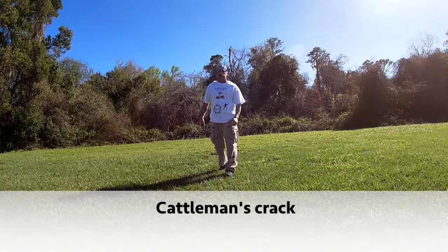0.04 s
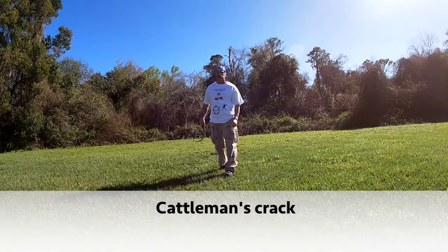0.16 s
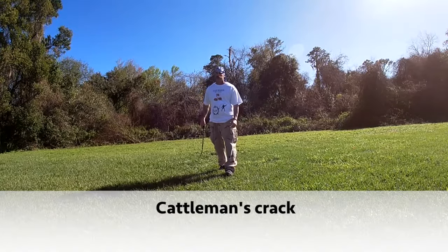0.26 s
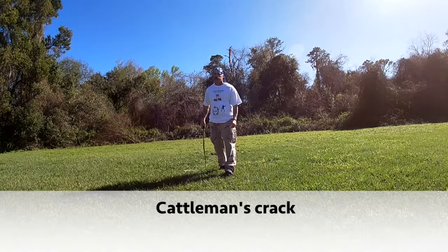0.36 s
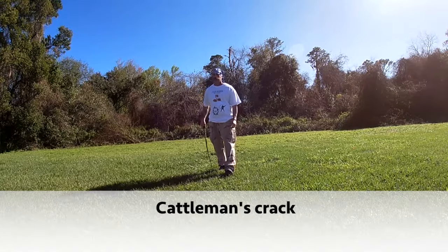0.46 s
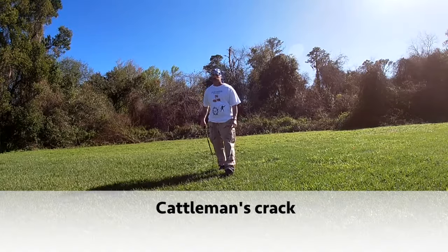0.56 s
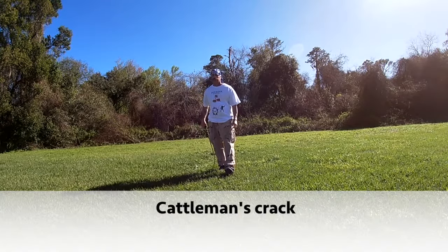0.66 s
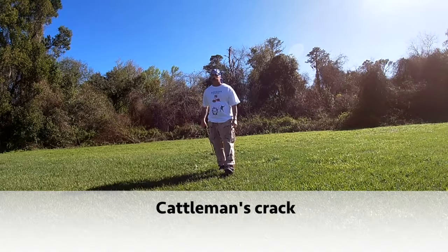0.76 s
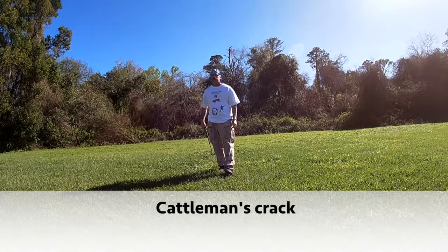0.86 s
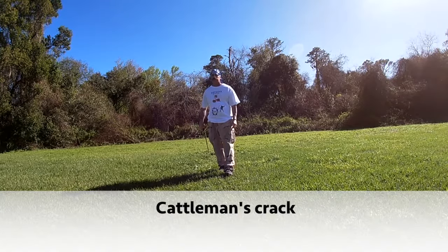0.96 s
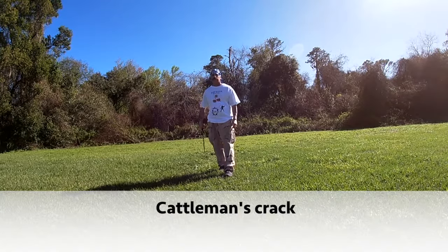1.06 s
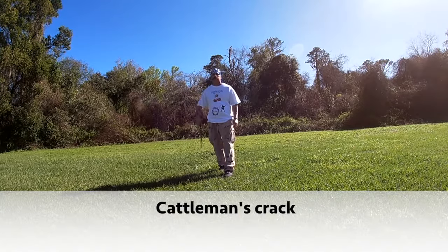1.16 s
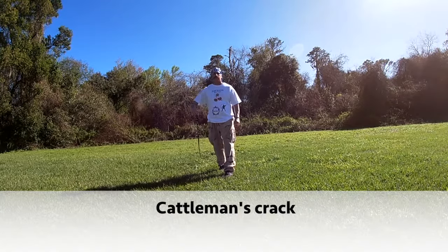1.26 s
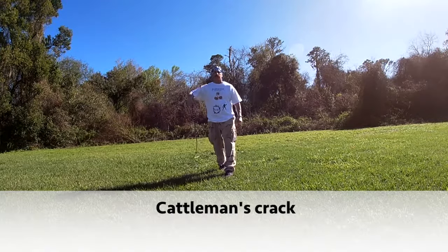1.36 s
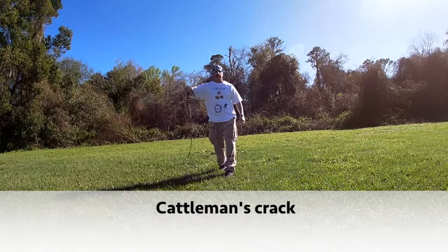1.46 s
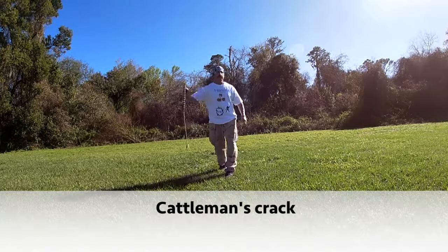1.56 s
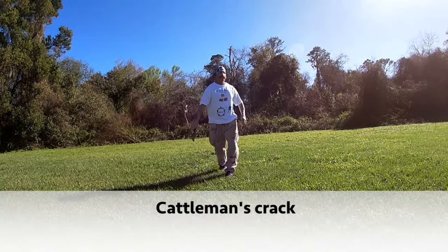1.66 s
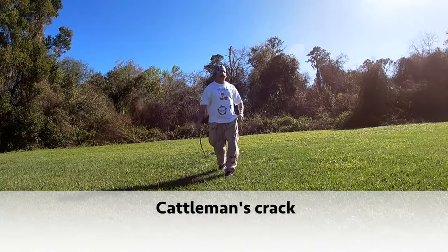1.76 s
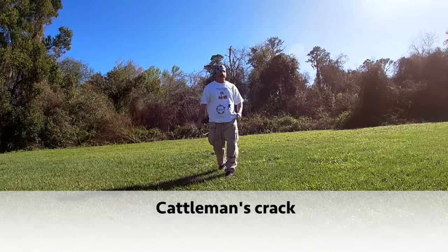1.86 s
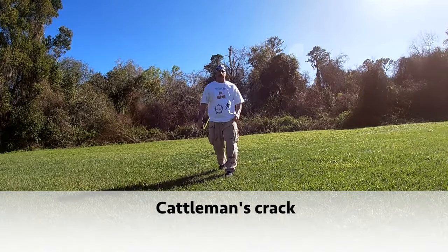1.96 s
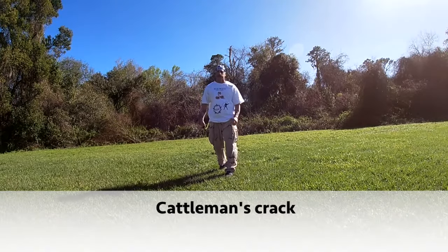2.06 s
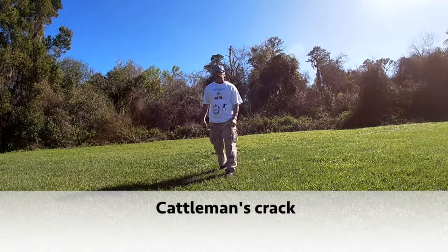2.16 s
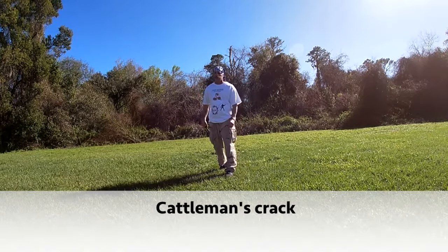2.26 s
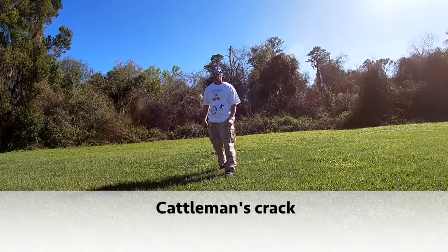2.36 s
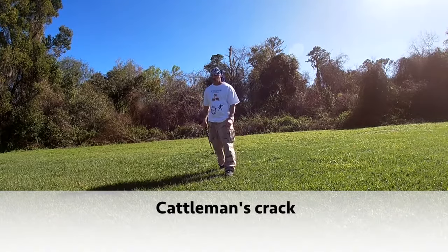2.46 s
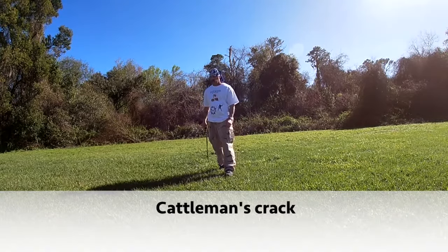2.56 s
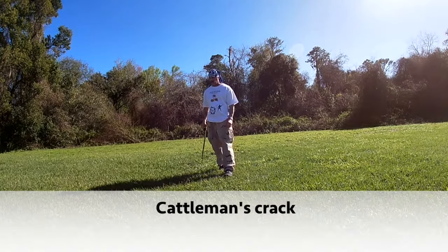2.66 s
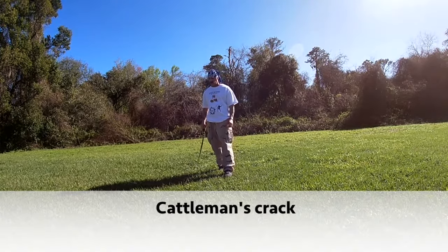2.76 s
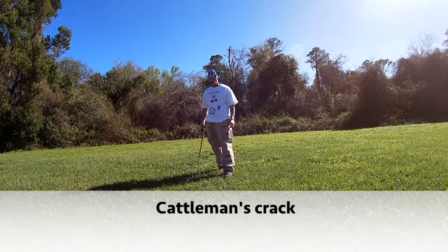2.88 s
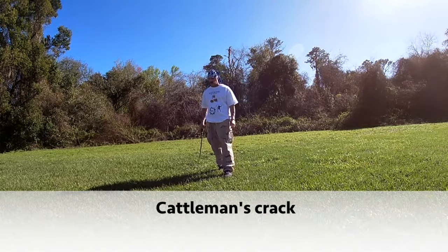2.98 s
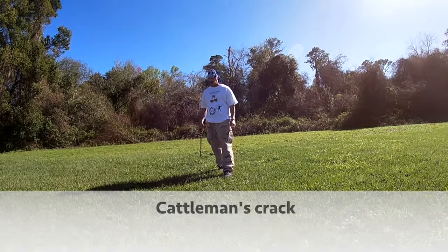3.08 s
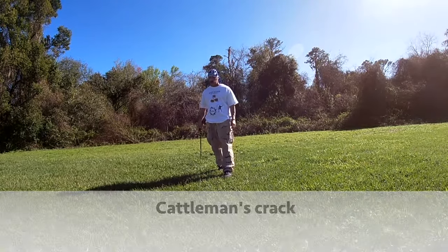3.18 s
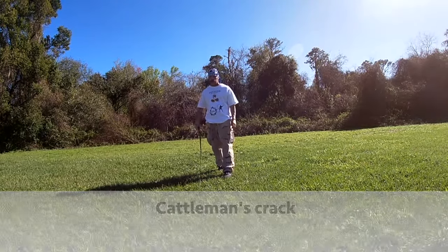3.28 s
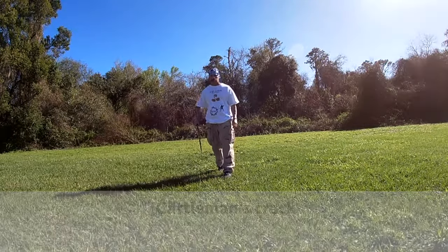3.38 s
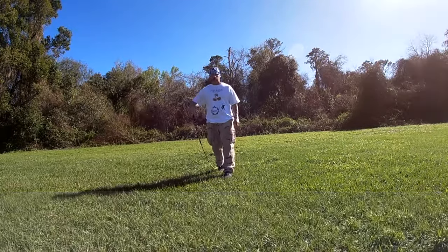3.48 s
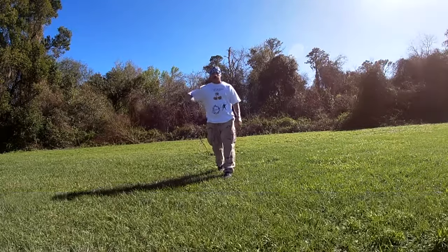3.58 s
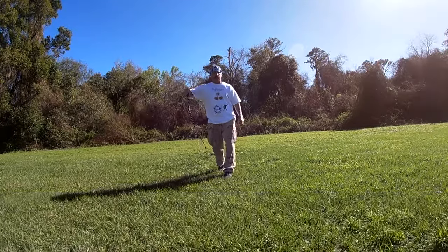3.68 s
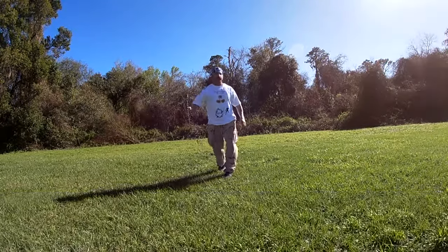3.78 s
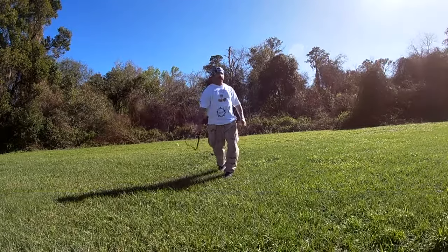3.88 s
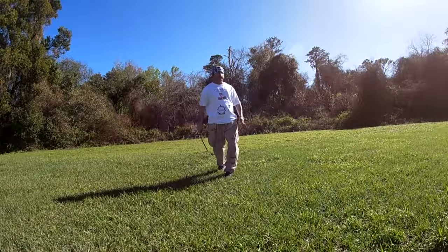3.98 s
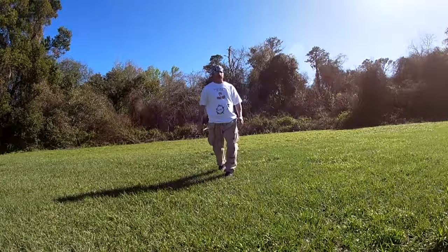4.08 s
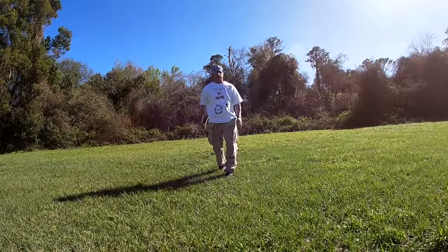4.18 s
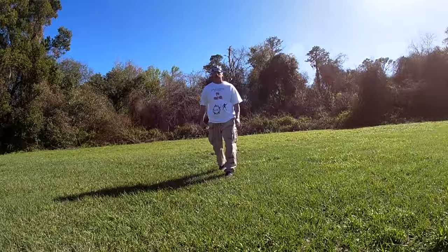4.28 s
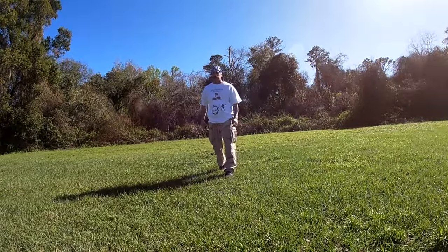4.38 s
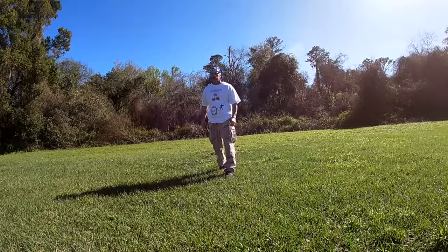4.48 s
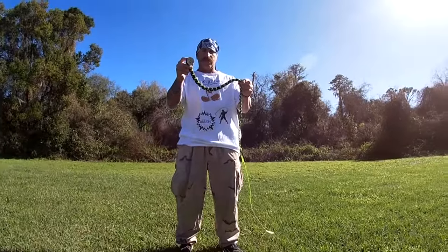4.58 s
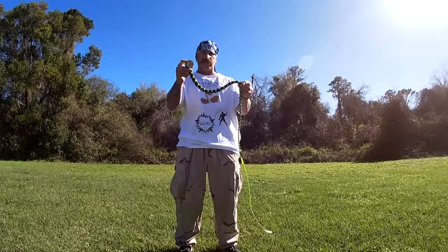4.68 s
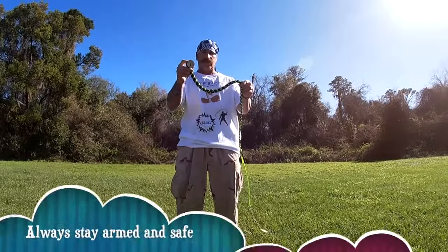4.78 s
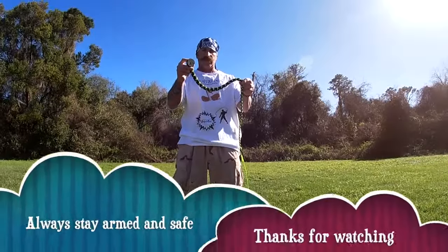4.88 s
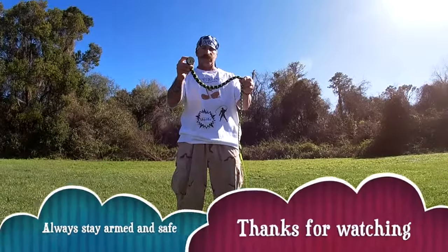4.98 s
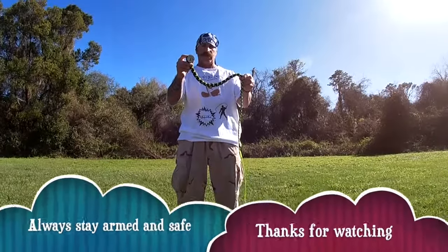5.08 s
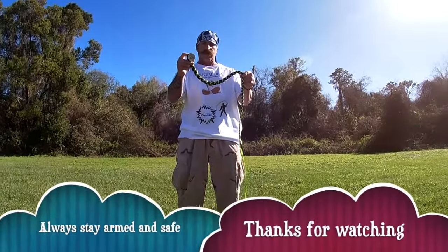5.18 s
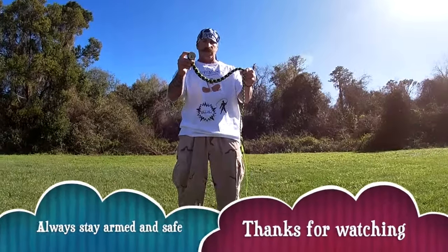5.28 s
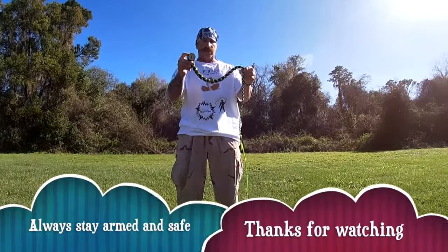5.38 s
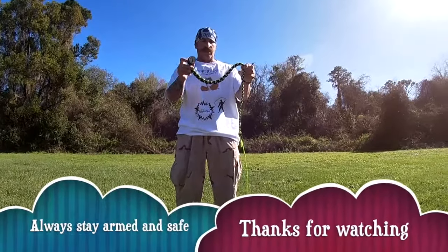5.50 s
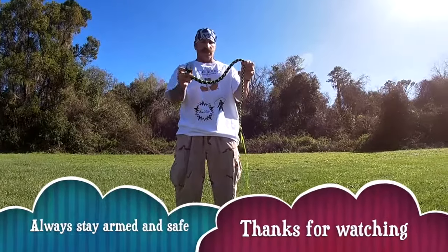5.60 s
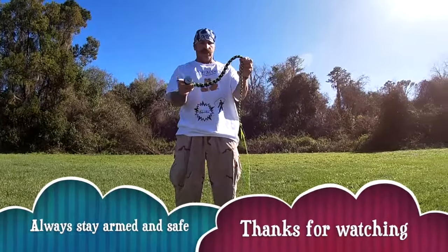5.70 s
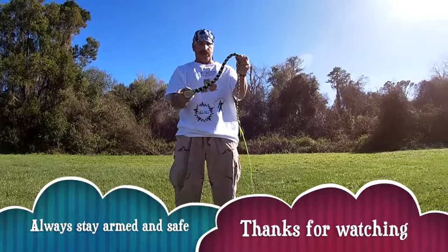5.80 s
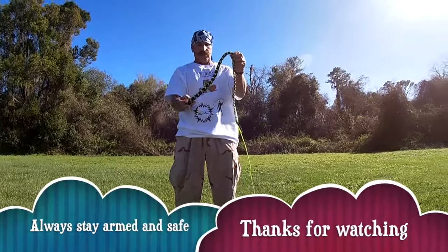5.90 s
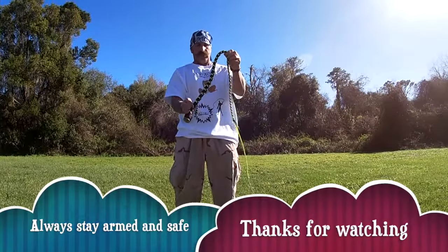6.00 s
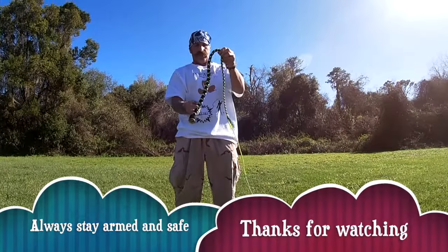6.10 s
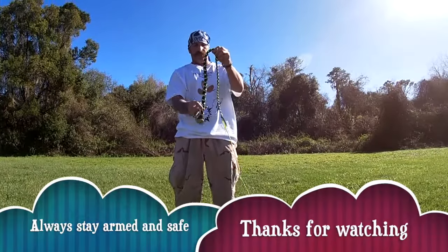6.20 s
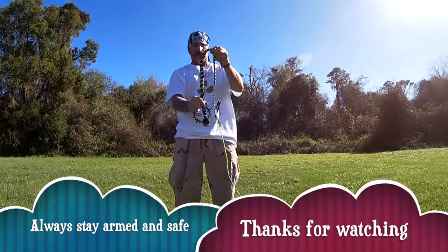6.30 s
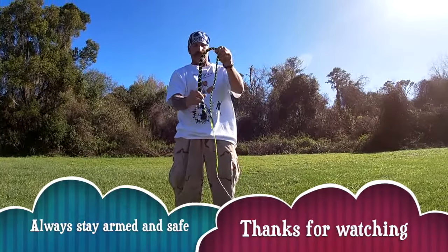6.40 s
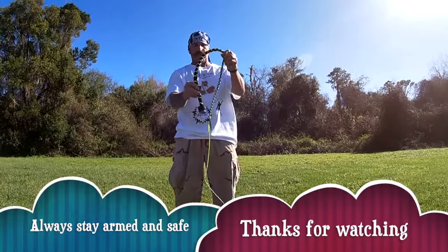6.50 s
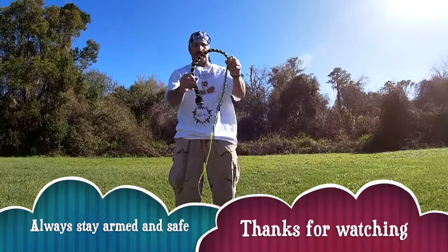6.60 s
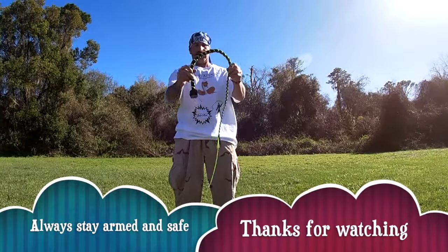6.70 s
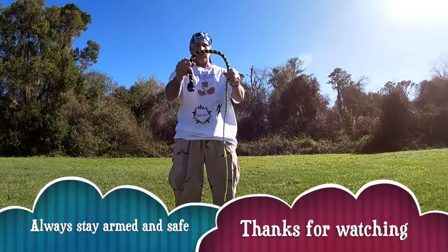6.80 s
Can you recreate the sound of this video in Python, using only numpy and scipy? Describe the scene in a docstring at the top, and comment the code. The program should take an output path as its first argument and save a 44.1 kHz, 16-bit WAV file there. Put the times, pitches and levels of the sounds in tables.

```python
"""On a lawn an engine idles with a deep throb while wind bumps the microphone. A whip's lash swishes,
a far bird whistles and the wing buzz of two katydids swells. At 1.7 s and 3.9 s the short whip cracks:
its supersonic tip fires a shock, and a wall of trees throws each crack back as a long hiss.
At 4.6 s the scene cuts to a calmer moment without the engine: light wind, far traffic,
faint katydids and one last whistle."""
import sys
import numpy as np
from scipy import signal
from scipy.fft import rfft, irfft, next_fast_len
from scipy.io import wavfile
from scipy.ndimage import map_coordinates

SR = 44100
rng = np.random.default_rng(int(sys.argv[2]) if len(sys.argv) > 2 else 0)


def to_wav(sig):
    """Store sig (one row per channel, or 1-D mono) as 16-bit WAV at the path in sys.argv[1].

    Samples outside -1..1 are clipped; the rate is SR.
    """
    pcm = np.clip(np.atleast_2d(sig), -1, 1) * 32767
    pcm = np.round(pcm).astype(np.int16)
    wavfile.write(sys.argv[1], SR, pcm.T)  # frames by channels


N = 302085
T = np.arange(N) / SR
CUT_S = 4.557

# open-air bed before the cut: (frequency [Hz], level [dB])
AIR_COLOUR = [(150, -6), (350, 3.5), (500, -1), (750, 0), (1250, -0.5), (1900, -5), (2900, -16.5),
              (5700, -24.5), (7700, -36.5), (9400, -29), (10800, -39.5), (12500, -44), (14500, -68)]
# calm-air bed after the cut: (frequency [Hz], level [dB])
CALM_COLOUR = [(150, -4), (330, -4.5), (520, -7), (880, 0.5), (1300, -5), (1850, -11), (2750, -26),
               (3700, -21), (4600, -25), (5500, -22.5), (7500, -31.5), (10000, -32), (12500, -49),
               (14500, -70)]
# rumble of far traffic: (frequency [Hz], level [dB])
TRAFFIC_COLOUR = [(30, -18), (85, 6), (120, -11), (160, 0.5), (240, -9), (330, -22.5), (600, -52),
                  (3000, -120)]
# low murmur under the engine: (frequency [Hz], level [dB])
MURMUR_COLOUR = [(40, -21), (80, 2.5), (150, 12), (230, -4), (350, -12.5), (500, -26.5), (900, -61.5),
                 (4000, -120)]
# boom of the exhaust pipe: (frequency [Hz], level [dB])
EXHAUST_COLOUR = [(25, -23), (50, -18.5), (75, -1), (100, 5.5), (125, 2), (150, 1.5), (178, -20.5),
                  (203, -9), (262, -33), (302, -22.5), (360, -38), (455, -43), (540, -39.5), (1000, -49),
                  (2000, -56), (4000, -100)]
# level ride of the exhaust: (time [s], level [dB])
EXHAUST_RIDE = [(0, -16), (1.1, -17), (3.3, -18), (3.55, -24.5), (3.9, -21), (4.55, -23)]
# engine tones: (pitch [Hz], base level [dB])
HUM_TONES = [(301.5, -39.5), (333, -47), (375, -50.5), (452, -53.5)]
# wind on the microphone: (frequency [Hz], level [dB])
BUFFET_COLOUR = [(10, -14.5), (25, -3.5), (42, 1), (90, -4.5), (160, -7.5), (230, -17.5), (350, -37.5),
                 (700, -58), (2000, -79), (8000, -130)]
# gusts on top of the breeze: (time [s], half length [s], level [dB])
WIND_GUSTS = [(0.103, 0.2, -21), (0.496, 0.33, -14), (5.57, 0.042, -45), (6.2, 0.11, -43),
              (6.622, 0.18, -41)]
# single eddies bumping the microphone: (time [s], level [dB], pitch [Hz])
WIND_BUMPS = [(0.4989, 1.5, 137), (0.516, -0.5, 99), (0.608, -0.5, 42), (0.7072, 2, 109.4),
              (2.968, -8.5, 43.2), (4.607, -21.5, 69.7), (6.573, -26, 216), (6.582, -21.5, 71),
              (6.616, -17, 54), (6.691, -20.5, 45.4)]
# far whistles: (time [s], length [s], start pitch [Hz], end pitch [Hz], level [dB])
BIRD_WHISTLES = [(0.673, 0.12, 3250, 3010, -56), (0.787, 0.025, 3050, 3160, -50),
                 (6.65, 0.07, 2100, 3250, -68)]
# one row per katydid: (stroke rate [1/s], top pitch [Hz], pitch bend [Hz per stroke squared],
# crest position [share of stroke], relative level [dB])
KATYDID_VOICES = [(61, 9740, 3100, .38, -2.5), (67, 10270, 1800, 0.59, -14)]
# a crack scattered by leaves and grass: (frequency [Hz], level [dB])
LEAF_COLOUR = [(300, -25), (800, -14.5), (1500, -4.5), (2200, 1.5), (3000, -1.5), (4000, 3.5), (5300, 0),
               (7200, -9.5), (10000, -2), (11700, -12.5), (13200, -13.5), (14500, -20), (15400, -53)]
# the lash sweeping through air and grass: (time [s], level [dB], half length [s], centre [Hz])
LASH_SWISHES = [(0.411, -45, 0.008, 9000), (0.412, -44.5, 0.0091, 4300), (0.44, -59, 0.027, 9500),
                (2.53, -56.5, 0.011, 4900), (2.654, -64, 0.02, 10500), (2.83, -68, 0.018, 10500),
                (3.022, -52, 0.016, 3360)]
# light taps of the cord: (time [s], level [dB], pitch [Hz], 60 dB fade [s], sharpness [Q])
CORD_TAPS = [(0.473, -29, 6170, 0.0047, 2.5), (2.85, -29, 3630, 0.014, 5.9),
             (2.985, -33.5, 4200, 0.0068, 3), (4.4156, -41, 7500, 0.0052, 3),
             (4.4225, -17, 3270, 0.0035, 0.85)]
# tone of a shock: (frequency [Hz], level [dB])
SHOCK_COLOUR = [(100, -3), (400, -1.5), (1000, 0.5), (1600, -1), (2300, 2.5), (3100, -2.5), (4000, 1),
                (5600, -7.5), (7500, -7.5), (9500, -1.5), (11500, -8.5), (13000, -14.5), (15500, -21)]
# whip hits: (time [s], crack gain [dB], lead snap gain [dB], tree send [dB], grass send [dB],
# tree echo treble [dB])
WHIP_CRACKS = [(1.7394, 0.5, -6.5, -18, -31, -5), (3.936, 0.1, -2, -22.5, -38.5, -2.5)]

TREES_DELAY_S = 0.089  # pre-delay: out to the edge of the wood and back


def amp(db):
    """Decibels to gain."""
    return 10 ** (np.asarray(db) / 20)


def unit(x):
    """x at rms 1."""
    return x / np.sqrt(np.mean(x ** 2) + 1e-20)


def along(points, hz):
    """(frequency, value) points read on a log axis."""
    knots_hz, values = np.transpose(points)
    return np.interp(np.log(hz + 1), np.log(knots_hz + 1), values)


def wobble(rate):
    """Smooth random modulation, rate knots a second."""
    return map_coordinates(rng.standard_normal(1024), [T * rate], mode="wrap")


def rise(t, width):
    """A smooth fade from 0 to 1 around t = 0."""
    return .5 + .5 * np.tanh(t / (2 * width))


def filtered(x, response):
    """EQ x with a gain curve over frequency."""
    size = next_fast_len(len(x) + 8192)
    return irfft(rfft(x, size) * response(np.fft.rfftfreq(size, 1 / SR)), size)[:len(x)]


def noise(colour, size=N):
    """Coloured noise of rms 1."""
    return unit(filtered(rng.standard_normal(size), lambda hz: amp(along(colour, hz))))


def band(centre_hz, q, size=N):
    """Noise of rms 1 around one pitch, with dark skirts."""
    peak = lambda hz: 1 / (1 + (q * (hz / centre_hz - centre_hz / (hz + 1))) ** 2)
    return unit(filtered(rng.standard_normal(size), lambda hz: peak(hz) / (1 + (hz / 12000) ** 14)))


def ring(colour, size=8192):
    """Minimum-phase impulse response of energy 1 with this colour."""
    cepstrum = irfft(np.log(amp(along(colour, np.fft.rfftfreq(size, 1 / SR)))))
    cepstrum[1:size // 2] *= 2
    cepstrum[size // 2 + 1:] = 0
    impulse = irfft(np.exp(rfft(cepstrum)))
    return impulse / np.linalg.norm(impulse)


def treble_shelf(x, treble_db, corner_hz=6000):
    """Lift or dull the top end."""
    return filtered(x, lambda hz: amp(treble_db * hz ** 4 / (hz ** 4 + corner_hz ** 4)))


def open_air(level_db=-39.5):
    """A bed of gently wavering air; at the start an earlier echo dies away in the trees."""
    air = noise(AIR_COLOUR) * amp(level_db + 0.36 * wobble(11))
    echo_tail = amp(-46) * band(3400, q=1.1) * np.exp(-T / 0.12)
    return air + echo_tail


def calm_air(level_db=-51.5, dip_db=5, settle_s=0.36):
    """A quieter bed that starts a little low at the cut and settles."""
    return noise(CALM_COLOUR) * amp(level_db - dip_db * np.exp(-np.abs(T - CUT_S) / settle_s))


def far_traffic(level_db=-43):
    """Distant traffic blurs into a drifting rumble."""
    return noise(TRAFFIC_COLOUR) * amp(level_db + wobble(3.7))


def engine(idle_hz=25.36, sag_hz_per_s=.125, jitter_s=.0001, spread_db=1.1, murmur_db=-26):
    """One exhaust puff per firing booms in the pipe; higher orders hum over a rough murmur."""
    firing_phase = np.cumsum(idle_hz - sag_hz_per_s * T) / SR + .27
    firings = np.flatnonzero(np.diff(np.floor(firing_phase)))
    slip, weakness = rng.standard_normal((len(firings), 2)).T
    onsets = np.clip(firings + np.round(jitter_s * SR * slip).astype(int), 0, N - 1)
    puffs = np.bincount(onsets, amp(-spread_db * weakness), N)
    boom = unit(signal.fftconvolve(puffs, ring(EXHAUST_COLOUR))[:N])
    boom *= amp(np.interp(T, *np.transpose(EXHAUST_RIDE)))
    hum = sum(amp(db + 2.6 * wobble(4.4)) * np.sin(2 * np.pi * hz * T + 0.69 * wobble(5))
              for hz, db in HUM_TONES)
    hum *= amp(.7 * (T - CUT_S / 2))  # the tones creep up on the exhaust
    return boom + hum + amp(murmur_db) * noise(MURMUR_COLOUR)


def wind(breeze_db=-23, ease_db_per_s=1.5, calm_db=-42, bump_cycles=0.48):
    """Breeze and gusts rumble on the microphone; single eddies push and pull it with a dull knock."""
    breeze = amp(np.where(T < CUT_S, breeze_db - ease_db_per_s * T, calm_db))
    gusts = sum(amp(db) * np.exp(-((T - at) / width) ** 2) for at, width, db in WIND_GUSTS)
    rumble = unit(noise(BUFFET_COLOUR) * amp(0.5 * wobble(13)))
    out = (breeze + gusts) * rumble
    for at, db, hz in WIND_BUMPS:
        cycles = (T - at) * hz
        knock = amp(-31) * band(3 * hz, q=2.1)  # imitates the bump overloading the microphone
        out += amp(db) * (knock - np.sin(2 * np.pi * cycles)) * np.exp(-(cycles / bump_cycles) ** 2)
    return out


def birds():
    """Far whistles glide softly in and out."""
    out = np.zeros(N)
    for at, length, start_hz, end_hz, db in BIRD_WHISTLES:
        progress = np.clip((T - at) / length, 0, 1)
        hz = start_hz + (end_hz - start_hz) * progress + 30 * wobble(150)
        out += amp(db) * np.sin(np.pi * progress) * np.sin(2 * np.pi * np.cumsum(hz) / SR)
    return out


def katydids(full_db=-61.5, far_db=-79.5, swell_db=5.5, swell_at_s=1, duty=0.55, waver_hz=35):
    """Each wing stroke is a short tone whose pitch arches with the speed of the scraper."""
    buzz = np.zeros(N)
    for rate, top_hz, bend_hz, crest, db in KATYDID_VOICES:
        stroke = np.clip((rate * T + .02 * wobble(4.1)) % 1 / duty, 0, 1)
        hz = top_hz - bend_hz * (stroke - crest) ** 2 + waver_hz * wobble(130)
        force = np.abs(np.sin(np.pi * stroke)) ** 0.23 * np.exp(-1.5 * (stroke - crest) ** 2)
        buzz += amp(db) * unit(force * np.sin(2 * np.pi * np.cumsum(hz) / SR))
    near_db = full_db - swell_db * rise(swell_at_s - T, .1)
    return buzz * amp(np.where(T < CUT_S, near_db, far_db))


def add(track, at, sound):
    """Drop a sound onto the track at a time in seconds."""
    part = track[max(round(at * SR), 0):][:len(sound)]
    part += sound[:len(part)]


def tree_envelope(t, attack_s=.0035, swell_db_per_s=58, hold_s=0.11, release_s=0.0074, tail_s=1.27):
    """The wood's edge swells as the wave spreads along it, then lets go; its depth rings on."""
    late = t - TREES_DELAY_S
    edge = amp(-11.5 + swell_db_per_s * late) * rise(hold_s - late, release_s)
    depth = amp(-3.5 - 60 * late / tail_s)
    return rise(late, attack_s) * np.hypot(edge, depth)


def echoes(air_loss_db_per_s=64, clump_db=1.4, grass_fade_s=0.2):
    """Grass scatters each crack at once; the trees answer later, duller as air soaks up the treble."""
    out, t = np.zeros(N), np.arange(SR) / SR
    for at, _, _, trees_db, grass_db, treble_db in WHIP_CRACKS:
        scatter = noise(LEAF_COLOUR, size=SR)
        scatter *= amp(clump_db * (wobble(130) + wobble(34.2)))[:SR]  # trunks and crowns reflect in clumps
        hz, delay, spectrogram = signal.stft(scatter, SR, nperseg=256)
        travel_s = np.maximum(delay - TREES_DELAY_S, 0)
        loss_db = air_loss_db_per_s * np.outer((hz / 10000) ** 1.65, travel_s)
        trees = signal.istft(spectrogram * amp(-loss_db), SR, nperseg=256)[1][:SR]
        add(out, at, treble_shelf(trees * amp(trees_db) * tree_envelope(t), treble_db))
        grass = treble_shelf(noise(LEAF_COLOUR, size=SR), treble_db=9)
        add(out, at, grass * amp(grass_db - 60 * t / grass_fade_s))
    return out


def lash(ring_share=0.45, attack_s=0.00005):
    """Around the cracks the lash swishes through air and grass and taps lightly."""
    out, t = np.zeros(N), np.arange(8192) / SR
    for at, db, width, hz in LASH_SWISHES:
        out += amp(db) * band(hz, q=1.8) * np.exp(-.5 * ((T - at) / width) ** 2)
    for at, db, hz, fade_s, q in CORD_TAPS:
        tap = ring_share * np.sin(2 * np.pi * hz * t) + band(hz, q, size=len(t))
        add(out, at, tap * amp(db - 60 * t / fade_s) * (1 - np.exp(-t / attack_s)))
    return out


def shock(fade_s, treble_db, attack_s=.00005, front_s=0.000084):
    """One shock front with a short spray of turbulence."""
    t = np.arange(4096) / SR
    front = (1 - t / front_s) * np.exp(-t / front_s)
    spray = 0.88 * rng.standard_normal(len(t)) * amp(-60 * t / fade_s)
    transient = (front + spray) * (1 - np.exp(-t / attack_s))
    return treble_shelf(signal.fftconvolve(transient, ring(SHOCK_COLOUR, size=512)), treble_db)


def whip_cracks(lead_s=.0105, rush_ahead_s=.002, rush_width_s=0.0046, tip_db=2.5, bounce_s=0.0019):
    """Each crack: a lead snap, a rush of air, the supersonic tip's bright shock and two dull bounces."""
    out = np.zeros(N)
    for at, db, lead_db, *_ in WHIP_CRACKS:
        add(out, at - lead_s, amp(lead_db) * shock(fade_s=0.034, treble_db=-2, attack_s=.0007))
        rush = amp(-21) * band(5510, q=.9)  # the tip speeds up
        thud = amp(-26) * band(251, q=1)  # the lash shoves air aside
        out += amp(db) * (rush + thud) * np.exp(-np.abs(T - at + rush_ahead_s) / rush_width_s)
        add(out, at, amp(db + tip_db) * shock(fade_s=0.0038, treble_db=8.5))
        for k, bounce_db in enumerate((-0.5, -2.5), start=1):
            add(out, at + k * bounce_s, amp(db + bounce_db) * shock(fade_s=.011, treble_db=-4.5))
    return out


def scene():
    """Whip, wind and animals ride over two beds, joined by a hard cut."""
    before_cut = np.clip((CUT_S - T) / 0.0012, 0, 1)
    air = open_air()
    calm_bed = far_traffic() + calm_air()
    engine_bed = air + engine() + echoes()
    background = before_cut * engine_bed + (1 - before_cut) * calm_bed
    return (whip_cracks() + lash() + wind() + katydids() + birds() + background)[None]


def record(dry, top_hz=15750):
    """The loudest peaks clip; a steep low-pass trims the very top."""
    clipped = np.clip(dry[0], -1, 1)
    return filtered(clipped, lambda hz: 1 / (1 + (hz / top_hz) ** 200))[None]


dry = scene()
out = record(dry)
to_wav(out)
```